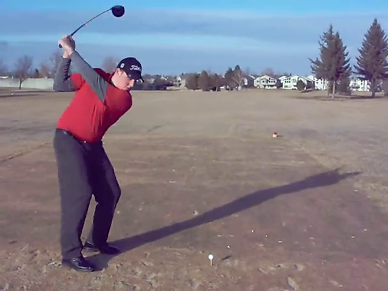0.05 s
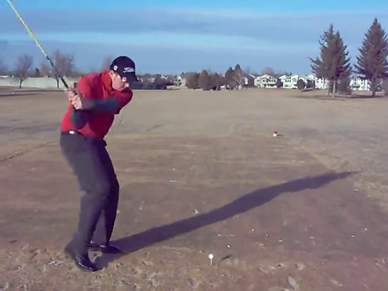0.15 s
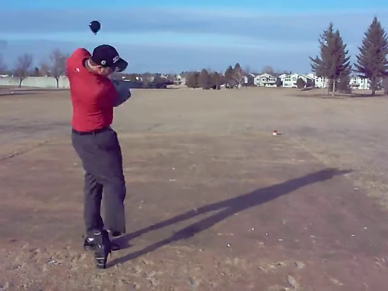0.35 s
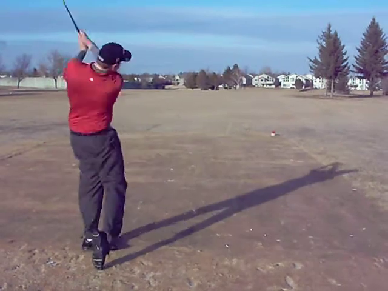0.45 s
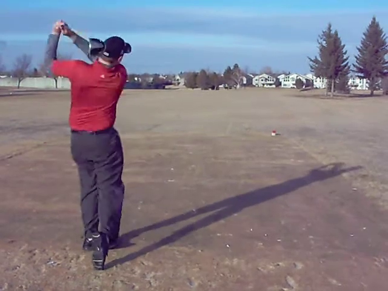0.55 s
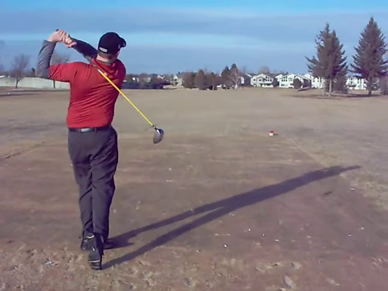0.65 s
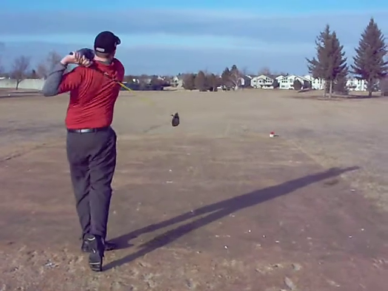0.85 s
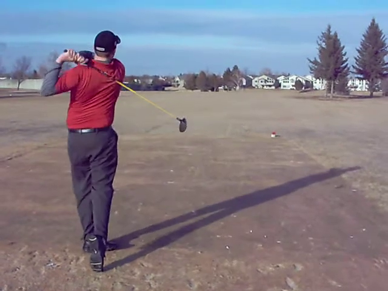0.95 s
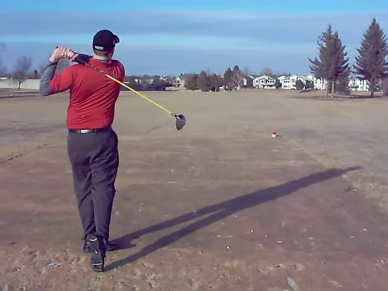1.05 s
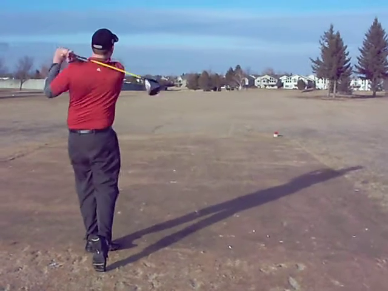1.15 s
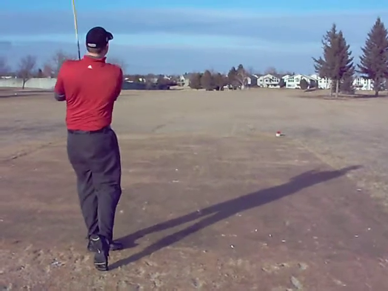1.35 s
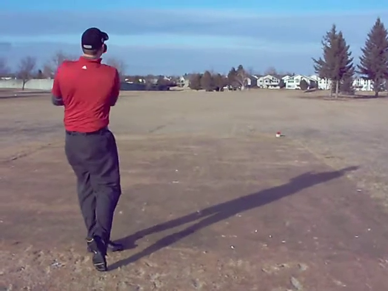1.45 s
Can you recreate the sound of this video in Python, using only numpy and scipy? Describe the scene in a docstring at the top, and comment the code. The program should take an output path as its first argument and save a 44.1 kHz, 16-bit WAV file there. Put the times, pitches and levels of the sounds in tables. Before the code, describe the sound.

A golf club swishes down and strikes the ball with a loud metallic crack that rings briefly. Faint foot scuffs and light wind follow on an open field, heard from close by.

```python
"""A golf drive on an open field, loud enough at the microphone to overload it on the strike.
The shaft whistles down, the hollow metal head cracks on the ball, and its ring glides upward
by Doppler shift as the head swings away and turns back. Turf and field scatter the sound and a
faint echo returns from ahead. Small scuffs, two thin peeps and a light wind lie behind it."""
import sys
import numpy as np
from scipy import signal
from scipy.fft import rfft, irfft
from scipy.io import wavfile

SR = 44100
rng = np.random.default_rng(int(sys.argv[2]) if len(sys.argv) > 2 else 0)


def log_audio(samples):
    """Write samples as a 16-bit WAV file to the path given in sys.argv[1]."""
    # one column per channel
    frames = np.atleast_2d(samples).T
    # limit to full scale, then quantise
    limited = np.clip(frames, -1, 1)
    pcm = np.round(limited * 32767).astype(np.int16)
    wavfile.write(sys.argv[1], SR, pcm)


N = 66150
T = np.arange(N) / SR
HZ = np.fft.rfftfreq(N, 1 / SR)
STRIKE_S = .2717

# Modes of the hollow club head. Each row: frequency in Hz, relative level in dB, t60 in seconds,
# swell time in seconds as the head turns its face.
HEAD_MODES = [(1714, -21, .21, .009), (2205, -6, .145, .034), (2474, 3, .121, .027),
              (2873, -13, .125, .022), (3706, -19, .076, .001), (4040, -4, .1, .007),
              (4205, -3, .065, .009), (5296, -8, .12, .033), (5550, -1, .085, .003), (5815, -4, .115, .009),
              (6038, 6, .067, .012), (6413, -9, .065, .006), (6629, 0, .062, .002), (7229, -9, .085, .003)]


def strike():
    """Snap and crack of ball on face, then the ringing head, heard directly and off the ground."""
    # Flight of the head. Each row: time in seconds, Doppler rise in percent, gain of the ring in dB.
    follow_through = [(.272, 0, -3), (.277, 0, 3), (.283, .2, -5), (.292, .5, 0), (.313, 3, 5),
                      (.318, 3.6, -3), (.335, 6.3, 1), (.355, 10.1, 1), (.375, 13.2, -3), (.405, 15.3, 2),
                      (.45, 16.5, 2)]
    rise_percent, ring_db = curves(follow_through)
    ground_db, ground_lag_s, ground_doppler_share = -12, .0013, .62
    direct = ring(STRIKE_S, rise_percent)
    bounce = amp(ground_db) * ring(STRIKE_S + ground_lag_s, rise_percent * ground_doppler_share)
    # Spectrum of the contact. Each row: frequency in Hz, relative density in dB.
    crack_spectrum = [(100, -32), (400, -13.5), (1000, 3.5), (1500, -8.5), (2400, 5.5), (3300, -10),
                      (4200, 4), (6000, -5), (7300, 7), (8800, -31)]
    crack = amp(-6) * blow(STRIKE_S, rise=.0001, t60=.11) * noise(colour(crack_spectrum))
    snap = amp(-6.5) * blow(STRIKE_S, rise=.0001, t60=.0079) * band(1310, octaves=.65)
    return amp(ring_db + 1) * (direct + bounce) + crack + snap


def ring(start, rise_percent):
    """The head's modes swell and die away, all shifted in pitch together by its motion."""
    doppler_clock = np.cumsum((T > start) * (1 + rise_percent / 100)) / SR
    age = np.maximum(T - start, 0)
    modes = np.zeros(N)
    for hz, db, t60, swell in HEAD_MODES:
        envelope = amp(db - 60 * age / t60) * (1 - np.exp(-(age / swell) ** 2))
        tone = flutter(hz) * np.exp(2j * np.pi * hz * doppler_clock)
        modes += envelope * tone.imag
    return modes


def flutter(hz, rate_hz=170):
    """Random wavering of a mode as the head spins; higher modes beam more narrowly and waver more."""
    times = np.arange(0, N / SR, 1 / rate_hz)
    depth = .55 * hz / HEAD_MODES[-1][0]
    real, imag = rng.standard_normal((2, len(times)))
    return (1 + depth * np.interp(T, times, real + 1j * imag)) / np.sqrt(1 + depth ** 2)


def swish():
    """Vortices shed by the shaft whistle higher with speed, over the hiss of the head."""
    # The downswing. Each row: time in seconds, whistle pitch in Hz, whistle and hiss levels in dB.
    downswing = [(.16, 567.6, -81, -62), (.192, 648.2, -43.5, -52.5), (.216, 677.5, -30, -37),
                 (.232, 726.6, -32.5, -33.5), (.246, 808, -25.5, -36), (.254, 877, -44.5, -34.5),
                 (.27, 881, -35.5, -34.5), (.298, 865.5, -25, -29), (.32, 698, -60, -36),
                 (.355, 559, -67.5, -66)]
    # Air rushing round the head. Each row: frequency in Hz, relative density in dB.
    hiss_spectrum = [(60, -8), (200, 0.5), (450, -1), (1100, -1.5), (1400, -2.5), (1850, 3), (2300, -10),
                     (3200, -6), (4300, -3.5), (6200, -8), (7500, -4), (8800, -17)]
    hz, whistle_db, hiss_db = curves(downswing)
    cycles = np.cumsum(hz) / SR
    relative_width, steadiness = .5, .45
    # Slow noise spreads the tone into a band whose width follows the pitch.
    slow = 1 / (1 + (2 * HZ / (relative_width * hz.mean())) ** 6)
    sway = np.interp(cycles / hz.mean(), T, noise(slow) + 1j * noise(slow))
    sway /= (abs(sway) + 1e-9) ** steadiness
    whistle = unit((sway * np.exp(2j * np.pi * cycles)).real)
    moving = (T > downswing[0][0]) & (T < downswing[-1][0])
    return moving * (amp(whistle_db) * whistle + amp(hiss_db) * noise(colour(hiss_spectrum)))


def scatter(x, level_db, t60):
    """Diffuse reflections from the surroundings, dying away."""
    tail = rng.standard_normal(N) * blow(0, rise=.009, t60=t60)
    return amp(level_db) * signal.fftconvolve(x, tail / np.linalg.norm(tail))[:N]


def echo(delay_s=.176, top_hz=3590):
    """A short, dull echo of the ring from down the field, higher because the head flew towards it."""
    start = STRIKE_S + delay_s
    reflection = amp(-30) * ring(start, rise_percent=7) * blow(start, rise=.004, t60=.057)
    return signal.sosfilt(signal.butter(2, top_hz, fs=SR, output="sos"), reflection)


def scuffs():
    """Short dry puffs from shoes, turf and clothes as the golfer turns."""
    # Each row: start in seconds, level in dB, centre in Hz, width in octaves, t60 in seconds.
    puffs = [(0.045, -50.5, 1260, 0.55, 0.04), (.471, -45.5, 2730, 0.22, 0.075),
             (0.474, -53, 6200, 0.28, 0.25), (.492, -45.5, 2500, 0.51, 0.073),
             (0.586, -50, 3200, 0.85, 0.066), (0.614, -51, 2830, 0.93, 0.067),
             (0.694, -51.5, 2270, 0.44, 0.032), (0.737, -50, 1490, 0.77, 0.081),
             (1.221, -53, 1620, 0.48, 0.047), (1.23, -56, 2680, .12, 0.028), (1.276, -58, 685, 0.5, 0.6),
             (1.323, -55, 1510, 0.085, .08)]
    return sum(amp(db) * blow(start, rise=.00067, t60=t60) * band(hz, octaves)
               for start, db, hz, octaves, t60 in puffs)


def peeps():
    """Two faint, nearly pure peeps, perhaps a bird in the distance."""
    # Each row: start in seconds, length in seconds, level in dB, pitch in Hz.
    calls = [(0.49, 0.042, -51, 2967), (0.7, 0.035, -53, 2940)]
    return sum(amp(db) * np.sin(np.pi * np.clip((T - start) / length, 0, 1)) * np.sin(2 * np.pi * hz * T)
               for start, length, db, hz in calls)


def wind(crossover_hz=300):
    """Light wind over the field: a low rumble that swells with small gusts, under an even hiss."""
    # Spectrum of the open air. Each row: frequency in Hz, relative density in dB.
    air_spectrum = [(25, 3.5), (50, 3.5), (75, 5), (110, 0.5), (160, -6.5), (250, -10), (400, -19),
                    (630, -21), (900, -23.5), (1800, -28), (7000, -32), (8700, -42.5), (10000, -88)]
    # The gusts. Each row: time in seconds, rumble level in dB, hiss level in dB.
    gusts = [(0, -43, -54), (.17, -45, -54.5), (.3, -47, -52), (.6, -50, -57), (.665, -46, -55.5),
             (.71, -43, -55), (.76, -45.5, -57), (1.1, -47, -57.5), (1.2, -45, -57.5), (1.32, -47, -57),
             (1.5, -46, -56.5)]
    rumble_db, hiss_db = curves(gusts)
    low_share = 1 / (1 + (HZ / crossover_hz) ** 4)
    rumble = noise(colour(air_spectrum) * np.sqrt(low_share))
    hiss = noise(colour(air_spectrum) * np.sqrt(1 - low_share))
    return amp(rumble_db) * rumble + amp(hiss_db) * hiss


def amp(db):
    """Decibels to gain."""
    return 10 ** (np.asarray(db) / 20)


def unit(x):
    """Scales to rms 1."""
    return x / np.sqrt(np.mean(x ** 2) + 1e-20)


def curves(table):
    """Each column of a timed table, joined by straight lines."""
    times, *columns = np.transpose(table)
    return [np.interp(T, times, column) for column in columns]


def noise(gain):
    """Noise of rms 1, shaped by a gain at each frequency."""
    return unit(irfft(rfft(rng.standard_normal(N)) * gain, N))


def band(hz, octaves):
    """Noise in a bell-shaped band."""
    return noise(np.exp(-.5 * (np.log2((HZ + 1) / hz) / octaves) ** 2))


def colour(points):
    """Gain at each frequency from rows of Hz and dB."""
    hz, db = np.transpose(points)
    return amp(np.interp(np.log(HZ + 1), np.log(hz), db))


def blow(start, rise, t60):
    """Envelope that rises and dies away; times in seconds."""
    age = np.maximum(T - start, 0)
    return (1 - np.exp(-age / rise)) * amp(-60 * age / t60)


def scene():
    """At the microphone: the club, scattered by rough turf nearby and weakly by the open field."""
    club = swish() + strike()
    turf = scatter(club, level_db=-13.5, t60=.06)
    field = scatter(club, level_db=-38.5, t60=.49)
    return (club + turf + field + echo() + scuffs() + peeps() + wind())[None]


def record(dry):
    """One microphone, overloading on the strike; then deep bass and high treble roll off."""
    ceiling_db, hardness = -14.5, 2.9
    low_cut_hz, top_hz, edge_hz = 62, 7500, 8900
    oversampled = signal.resample_poly(dry, 2, 1, axis=1)
    clipped = oversampled / (1 + abs(oversampled / amp(ceiling_db)) ** hardness) ** (1 / hardness)
    out = signal.resample_poly(clipped, 1, 2, axis=1)
    out = signal.sosfilt(signal.butter(1, low_cut_hz, "high", fs=SR, output="sos"), out)
    out = signal.sosfilt(signal.butter(6, top_hz, fs=SR, output="sos"), out)
    steep_lowpass = signal.firwin(151, edge_hz, window=("kaiser", 5), fs=SR)
    return signal.oaconvolve(out, steep_lowpass[None], "same")


dry = scene()
out = record(dry)
log_audio(out)
```